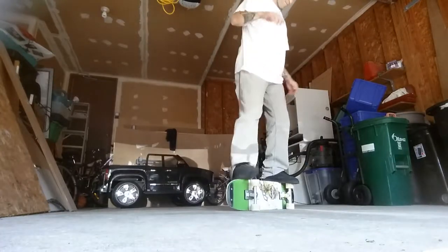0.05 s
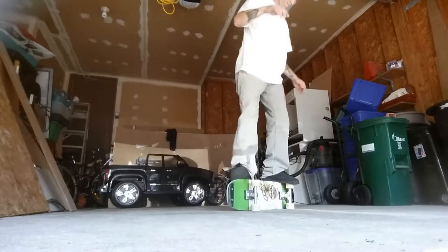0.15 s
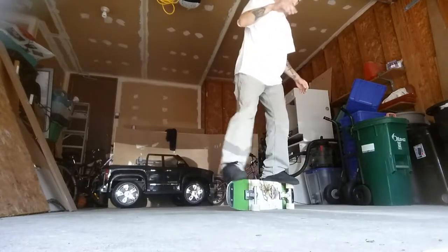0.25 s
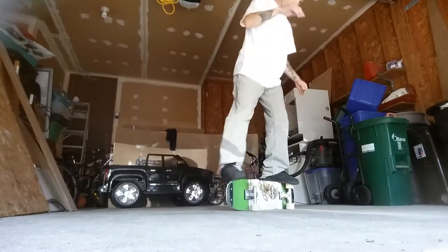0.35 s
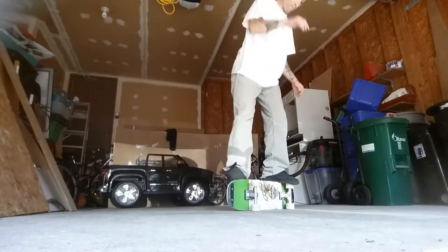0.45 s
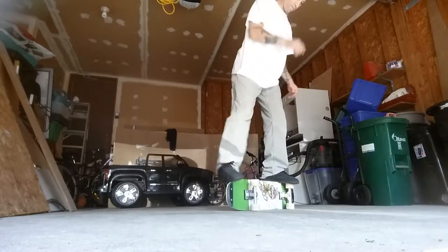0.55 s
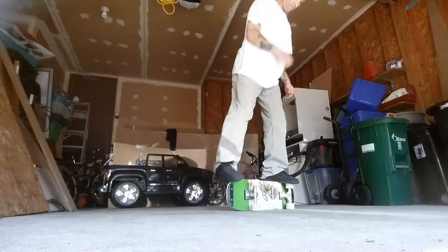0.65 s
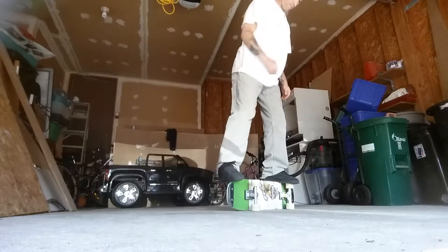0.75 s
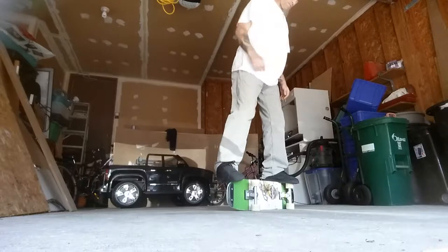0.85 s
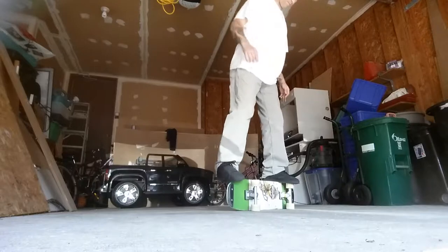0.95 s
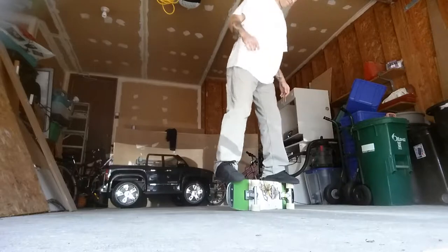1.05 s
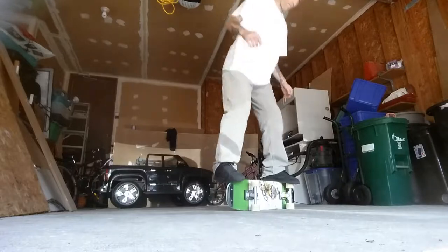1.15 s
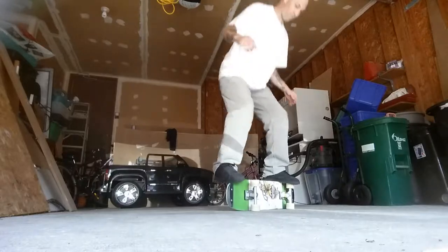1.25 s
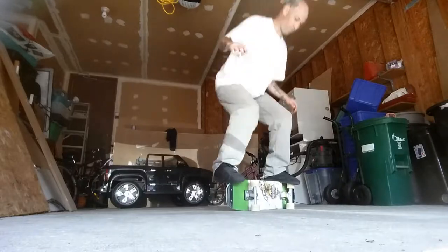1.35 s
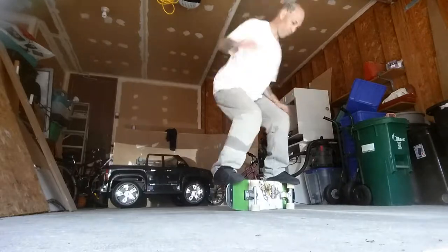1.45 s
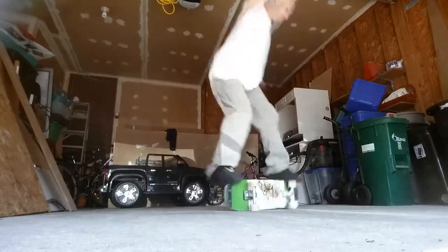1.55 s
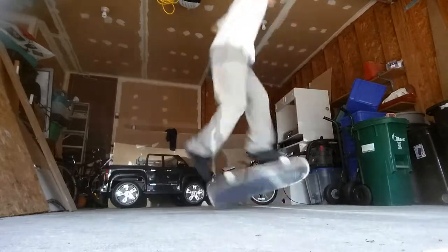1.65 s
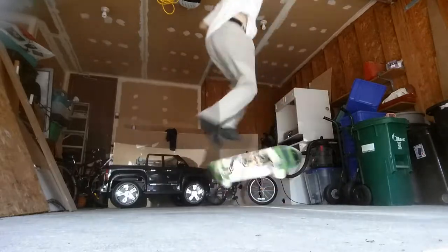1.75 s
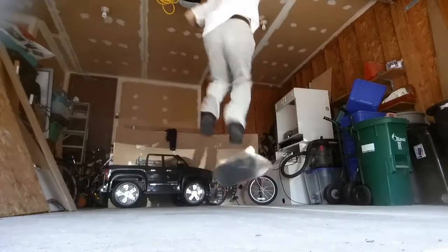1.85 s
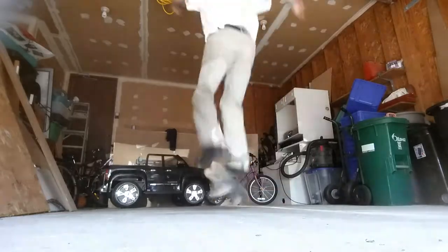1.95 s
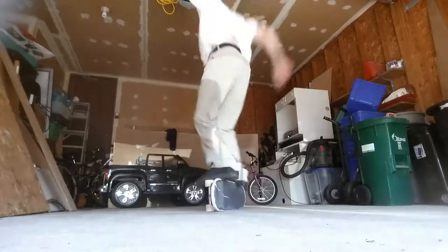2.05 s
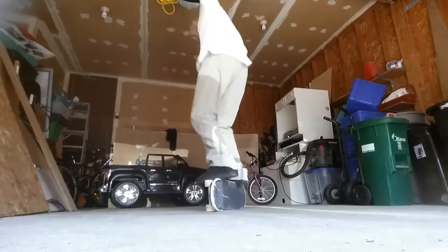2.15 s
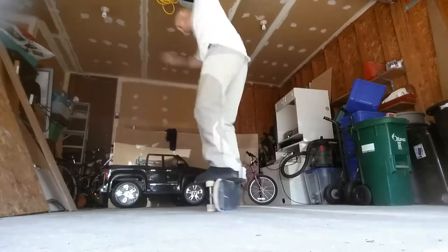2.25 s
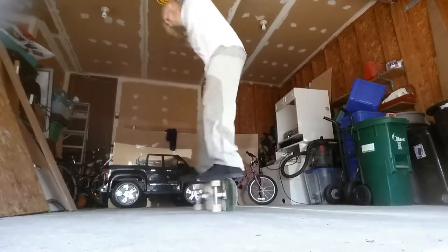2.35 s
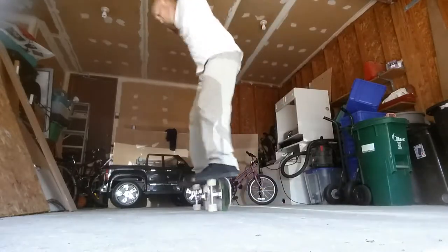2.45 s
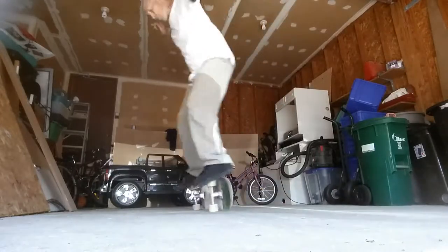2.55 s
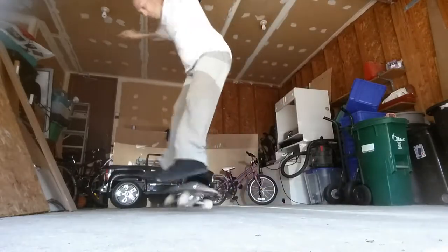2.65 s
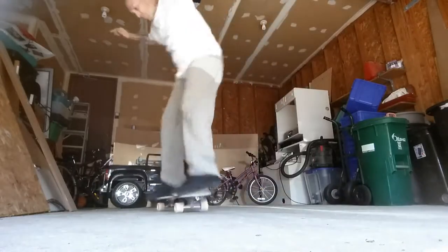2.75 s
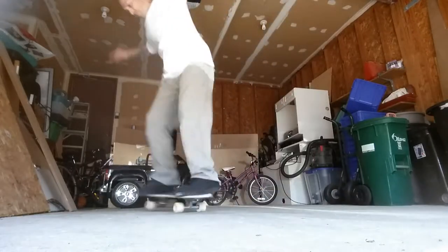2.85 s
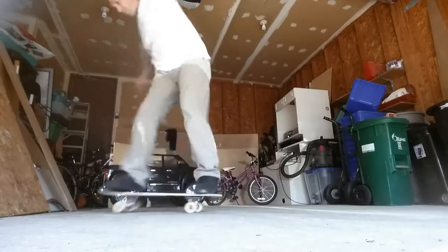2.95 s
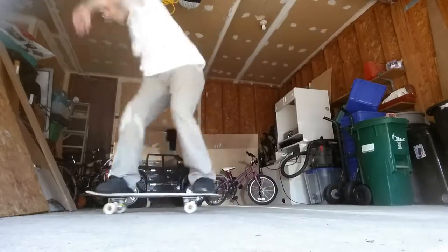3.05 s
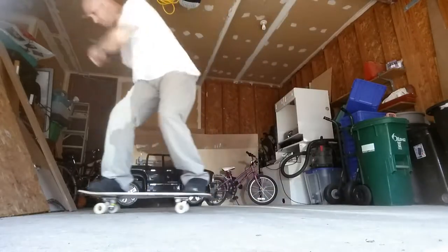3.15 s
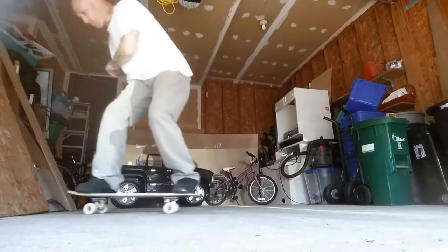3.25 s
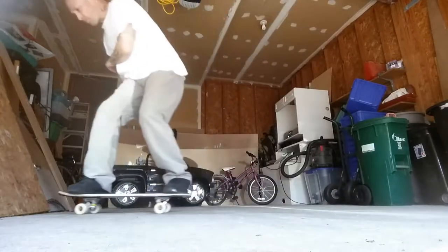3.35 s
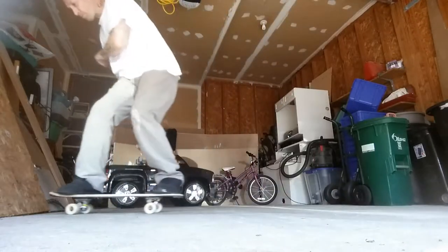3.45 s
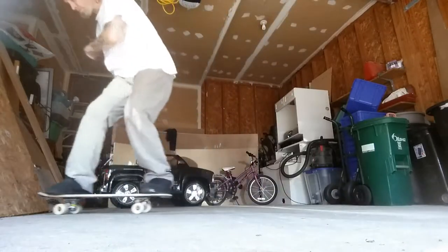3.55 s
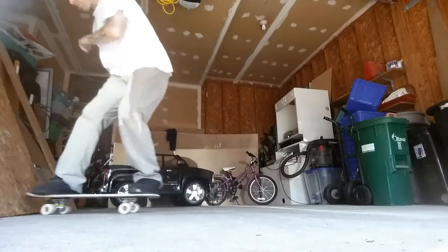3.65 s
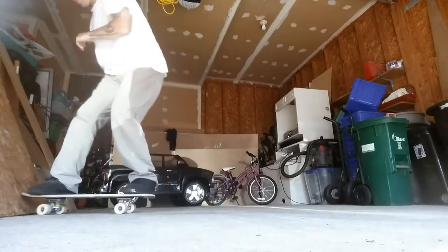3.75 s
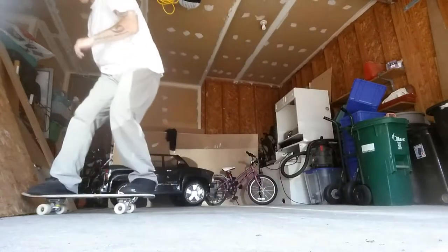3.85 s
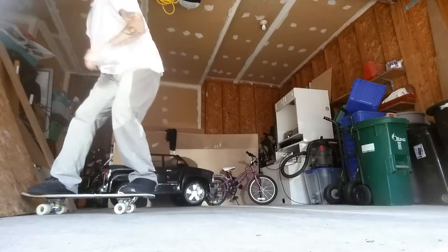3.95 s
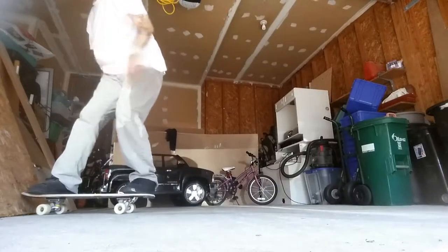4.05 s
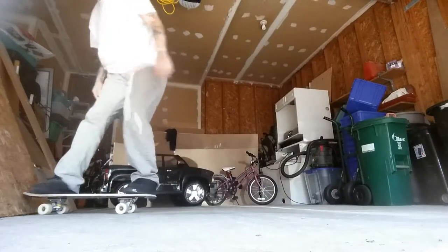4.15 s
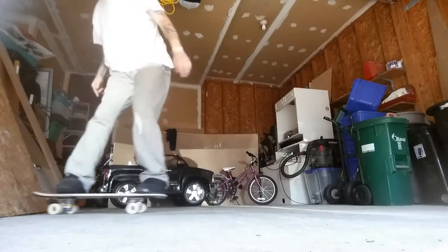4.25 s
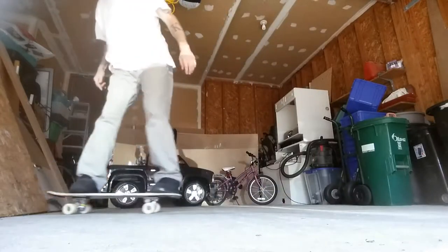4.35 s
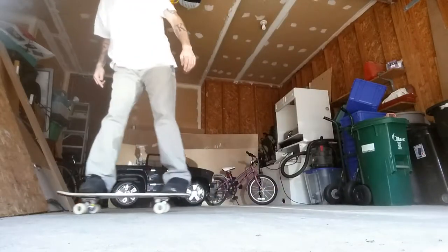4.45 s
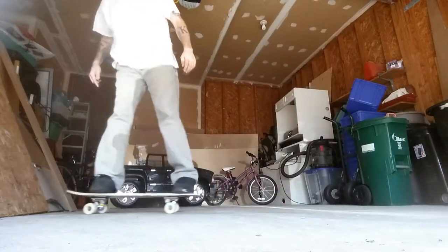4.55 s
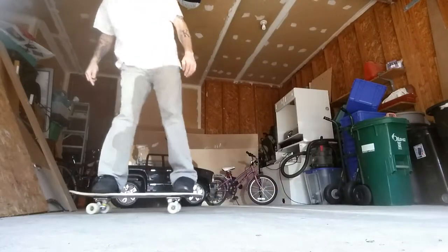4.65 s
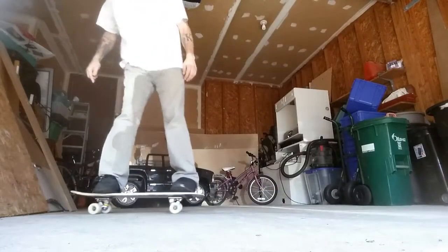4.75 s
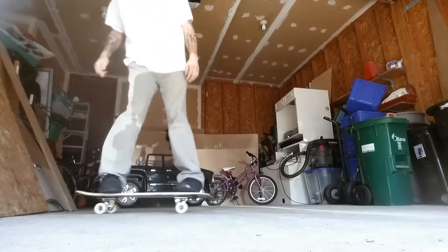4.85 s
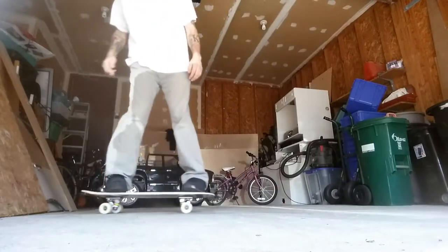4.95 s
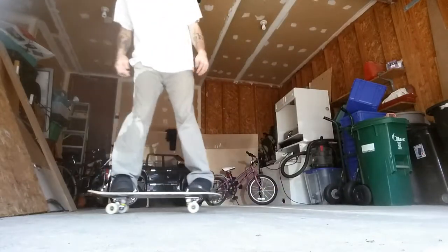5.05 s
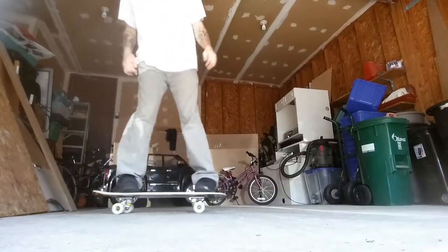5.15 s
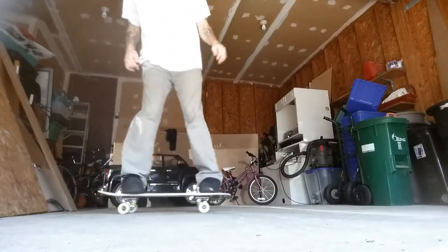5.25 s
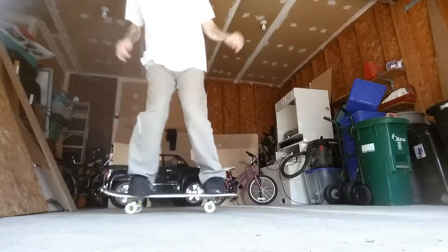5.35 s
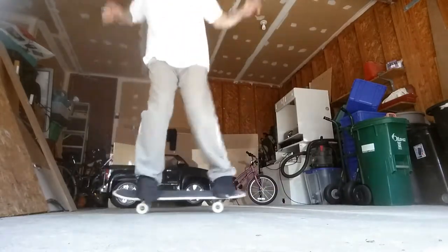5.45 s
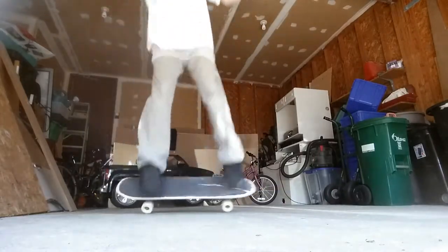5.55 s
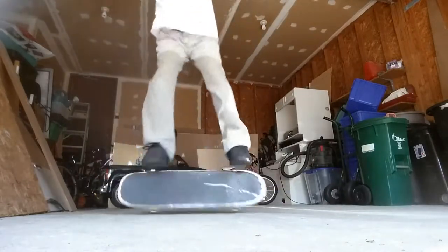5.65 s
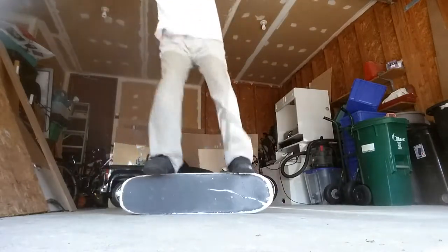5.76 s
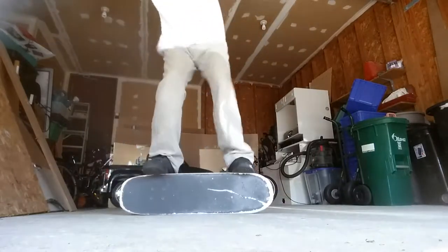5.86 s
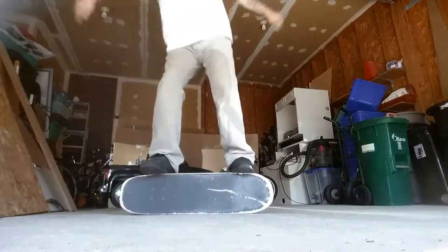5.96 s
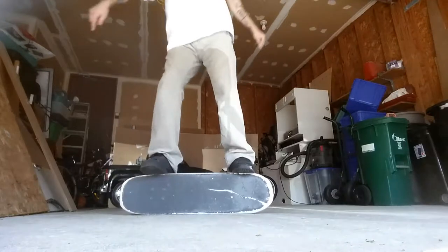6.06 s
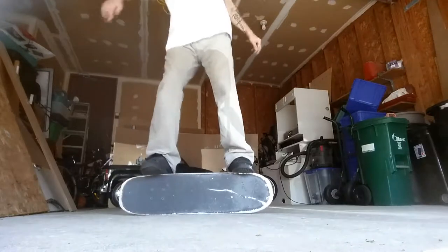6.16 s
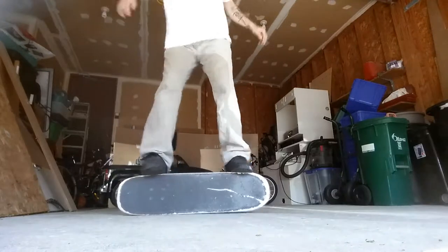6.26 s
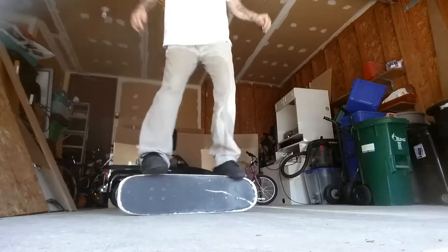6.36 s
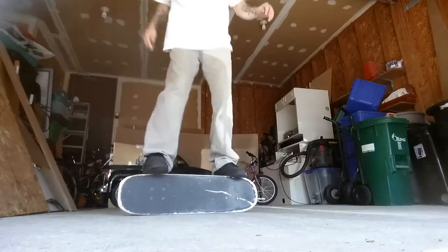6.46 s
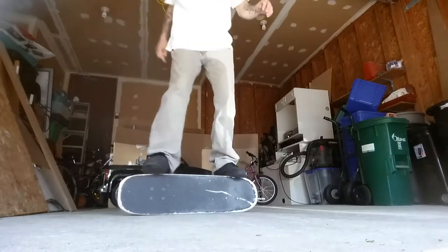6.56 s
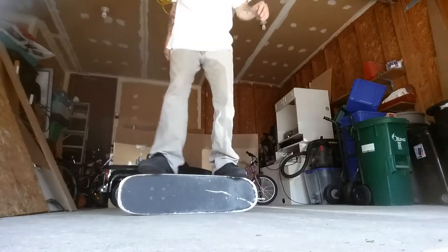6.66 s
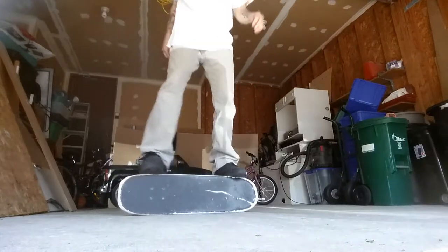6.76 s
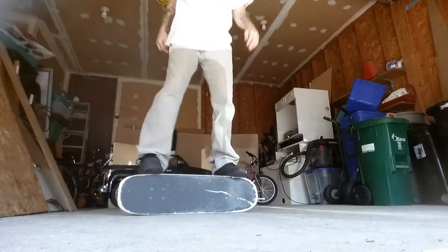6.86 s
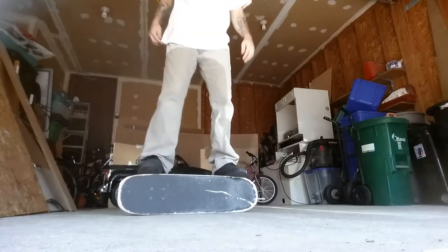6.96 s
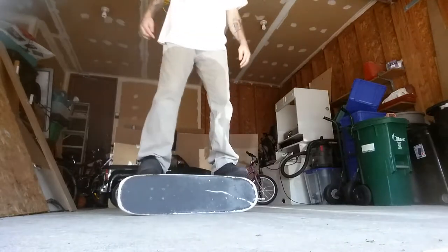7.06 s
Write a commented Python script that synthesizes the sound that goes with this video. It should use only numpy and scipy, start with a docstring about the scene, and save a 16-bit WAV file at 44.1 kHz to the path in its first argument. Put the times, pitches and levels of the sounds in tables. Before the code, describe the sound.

In a small hard garage, a skateboard on its edge knocks on concrete amid gritty scuffs, then flips and lands in a loud wooden clatter. A second heavy slam follows, then lighter knocks and wheel slaps, a heavy deck knock, near quiet, and a final sharp slam onto the edge. Small creaks and one more knock trail off. Faint low motor hum; close low stereo microphones with short dense echo.

```python
"""Wooden knocks, clattering landings, scuffs and rolling wheels ring out in a small hard garage over a low hum.
A skater flips his board off its edge, lands, pivots, rolls and kicks it back onto its edge.
Each blow is a filtered burst with deck tones, heard directly and by echo; low booms and truck rings join it.
Scuffs and rolling are grains of noise, creaks are short runs of slips, and the hum is motor tones with faint air.
Two microphones of unlike colour pick it all up."""
import sys
import numpy as np
from scipy import signal
from scipy.fft import rfft, irfft
from scipy.io import wavfile
from scipy.ndimage import uniform_filter1d

SR = 44100
rng = np.random.default_rng(int(sys.argv[2]) if len(sys.argv) > 2 else 0)


def store_wav(level_fs):
    """Save 16-bit WAV to argv[1]."""
    pcm = np.round(np.clip(np.atleast_2d(level_fs), -1, 1) * 32767)
    wavfile.write(sys.argv[1], SR, pcm.T.astype(np.int16))


N = 313992  # samples in the whole scene
SIZE = 24576  # samples in one blow, boom, creak, ring or echo

# frequency ranges of thud, knock, clack and rattle: from f/Hz, to f/Hz
BLOW_BANDS = [(100, 450), (450, 1500), (1500, 3200), (4500, 12000)]
# broad colour of a blow on the board: f/Hz, level per Hz/dB
BLOW_COLOUR = [(25, -52), (65, -8.5), (150, -4), (350, -1), (700, 0), (1300, -1), (2100, -5.5), (2800, -13),
               (3700, -25), (5200, -27), (6900, -23), (9000, -41), (14000, -53)]
# the deck knocks on the concrete, booming low under the rider's weight and higher on its edge:
# t/s, force/dB, hardness/dB, room/dB, favoured f/Hz, middle of the boom f/Hz
DECK_KNOCKS = [(.05, -17.5, 0, -5.5, 1120, 1102), (0.2973, -18.5, 7.5, 2.5, 1730, 417),
               (.578, -21, -0.5, 2.5, 655, 645), (1.669, -24, 12, 0.5, 736, 504),
               (1.692, -23, -1, 5, 710, 81), (1.785, -25, -4, 6, 496, 71.5),
               (2.142, -19.5, -6, 2.5, 840, 180), (2.486, -17.5, 5.5, 2, 1480, 370.3),
               (2.535, -26.5, -12, 3.5, 583, 309), (2.63, -25.5, -18, 6, 594, 433.3),
               (2.891, -19, 2.5, 4, 254, 165.7), (3.838, -9.5, -10, -0.5, 1440, 189.9),
               (3.853, -14, -14, -0.5, 629, 213.6), (3.932, -27.5, -4.5, 4, 316, 288.4),
               (5.712, -14.5, 16, -1.5, 1505, 135.5), (6.474, -14, -1.5, -1.5, 952, 153)]
# wheels slap down and shake the trucks: t/s, force/dB, hardness/dB, room/dB
WHEEL_SLAPS = [(1.725, -33.5, 16, -22), (2.598, -29.5, -3, 4.5), (2.816, -21.5, 0.5, 12),
               (2.855, -25, -1.5, 14.5), (2.876, -33.5, -3, 23.5), (3.105, -16.5, 3, 8),
               (3.12, -25.5, -3.5, 20), (5.145, -30, 0.5, 0), (5.639, -27.5, 7, 4),
               (5.651, -21.5, -2.5, 10), (5.7023, -13, -12, 9)]
# strokes of soles and wheels over the floor: start t/s, length/s, grinding/dB, hiss/dB
FLOOR_STROKES = [(0, 0.026, -41, -56), (0.117, 0.18, -29.5, -40.5), (0.26, 0.63, -46.5, -56),
                 (0.454, 0.18, -39, -48), (1.3, 0.48, -50.5, -57), (1.638, 0.13, -25, -44),
                 (1.789, 0.25, -32.5, -41.5), (2.364, 0.19, -35, -50), (2.706, 0.11, -43.5, -55.5),
                 (3.515, 0.78, -52.5, -74.5), (4.226, 0.53, -53, -68), (4.378, 0.094, -38, -51),
                 (4.703, 0.29, -51, -58), (4.88, 0.31, -49, -54.5), (5.296, 0.36, -50, -42),
                 (5.515, 0.12, -35.5, -44.5), (6.31, 0.46, -48.5, -58), (6.794, 0.27, -51, -82)]


def amp(db):
    """Turns decibels into a gain."""
    return 10 ** (np.asarray(db) / 20)


def evened(x):
    """Scales to an rms (average strength) of one."""
    return x / np.sqrt(np.mean(x ** 2) + 1e-20)


def unit(x):
    """Scales each channel to an energy of one."""
    return x / np.sqrt(np.sum(x ** 2, axis=-1, keepdims=True) + 1e-20)


def read(points, hz):
    """Reads a curve between its points on a log-frequency axis."""
    f, value = np.transpose(points)
    return np.interp(np.log(hz + 1), np.log(f + 1), value)


def add(mix, s, sound):
    """Mixes a sound in at time s, cut off at the end of the scene."""
    part = mix[:, max(round(s * SR), 0):][:, :sound.shape[1]]
    part += sound[:, :part.shape[1]]


def tinted(x, points):
    """Filters x by a spectrum and scales it to an rms of one."""
    gain = amp(read(points, np.fft.rfftfreq(N, 1 / SR)))
    return evened(irfft(rfft(x) * gain, N))


def causal(db):
    """Minimum-phase filter with the given gain: nothing sounds before the contact."""
    log_gain = np.log(amp(np.r_[db, db[-2:0:-1]]))
    return np.exp(np.conj(signal.hilbert(log_gain)))[:len(db)]


def resonance(hz, centre, q):
    """Power gain of one resonance, about 1 at its centre; a higher q is narrower."""
    ratio = (hz + 1) / centre
    return 1 / (1 + (q * (ratio - 1 / ratio)) ** 2)


def diffuse(pair):
    """Two unrelated signals as sound from all around: alike in the bass, unlike in the treble."""
    # left-right likeness of the room sound: f/Hz, likeness (1 = the same)
    likeness = [(60, 1), (130, 0.87), (260, 0.9), (500, 0.66), (1000, 0.063), (3000, 0), (8000, 0)]
    a, b = rfft(pair)
    same = np.clip(read(likeness, np.fft.rfftfreq(pair.shape[1], 1 / SR)), -1, 1)
    mid, side = a * np.sqrt((1 + same) / 2), b * np.sqrt((1 - same) / 2)
    return irfft([mid + side, mid - side], pair.shape[1])


def garage(gap=0.00089, build=0.0039, single_db=-4, thin=0.014):
    """Echo from one spot: a few wall reflections in a dense tail, each band dying at its own speed."""
    # gap: silence first (s); build: time to full strength (s); thin: how fast single reflections fade (s)
    # echo decay: f/Hz, time to die by 60 dB/s
    decay = [(100, 0.27), (300, 0.39), (800, 0.38), (2000, 0.44), (6000, 0.41), (14000, 0.27)]
    t = np.arange(SIZE) / SR
    # about 400 single reflections a second
    walls = rng.standard_normal((2, SIZE)) * (rng.random(SIZE) < 400 / SR) * np.exp(-t / thin)
    taps = diffuse(rng.standard_normal((2, SIZE)) + 10 * amp(single_db) * walls)
    hz, age, z = signal.stft(taps, SR, nperseg=256)
    fade = np.exp(-np.log(1000) * age / read(decay, hz)[:, None])
    tail = signal.istft(z * fade, SR)[1][:, :SIZE]
    return unit(tail * np.clip((t - gap) / build, 0, 1))


def hum(motor_db=0, air_db=-2.5, waver=0.005):
    """A small motor's overtones beat into a low throb with faint air, rising and sinking on a set curve."""
    motor_hz = 21.9  # average turns per second of a small motor somewhere in the garage
    # motor overtones: multiple of the turning speed, relative level/dB
    overtones = [(4, 0.5), (5, 3), (6, 1.5), (8, -5.5), (11, -5.5), (12, -13.5)]
    # colour of the air: f/Hz, level per Hz/dB
    air_colour = [(25, -23.5), (45, -8), (120, 1), (170, -5.5), (250, -6.5), (500, -12.5), (1000, -20),
                  (2000, -26.5), (3700, -38), (6800, -34), (10000, -59)]
    # loudness of motor and air together: t/s, level/dB
    hum_level = [(0.0, -42), (1.09, -50.5), (1.35, -46), (2.0, -49.5), (2.202, -59), (3.7, -54.5),
                 (3.959, -48.5), (4.69, -55), (5.13, -46), (5.74, -47), (6.1, -60.5), (7.11, -53)]
    drift = evened(uniform_filter1d(rng.standard_normal(N), SR // 4))
    turns = np.cumsum(motor_hz * (1 + waver * drift)) / SR
    tones = [amp(db) * np.sin(2 * np.pi * (round(k) * turns + rng.random())) for k, db in overtones]
    motor = evened(sum(tones))
    air = tinted(diffuse(rng.standard_normal((2, N))), air_colour)
    loudness = amp(np.interp(np.arange(N) / SR, *np.transpose(hum_level)))
    return (amp(motor_db) * motor + amp(air_db) * air) * loudness


def arches(levels_db):
    """Each stroke is one arch of pressure at the given height; overlapping strokes add their power."""
    skew, point = 0.8, 1.41  # the top lies a little before the middle; a higher point is a sharper arch
    power = np.zeros((1, N))
    for (s, length, *_), db in zip(FLOOR_STROKES, levels_db):
        u = np.linspace(0, 1, int(length * SR))
        arch = amp(db) * abs(np.sin(np.pi * u ** skew)) ** point
        add(power, s, arch[None] ** 2)
    return np.sqrt(power[0])


def grit(per_s, spread_db):
    """Grains of concrete and grip tape catch and let go: many small, a few large."""
    size = amp(spread_db * np.minimum(rng.exponential(1, N), 4))
    return rng.standard_normal(N) * size * (rng.random(N) < per_s / SR)


def shifting(x, patchy_db=2.5):
    """A scrape's colour shifts from moment to moment as the contact moves over the grit."""
    z = signal.stft(x, nperseg=512)[2]
    patches = uniform_filter1d(rng.standard_normal(z.shape), size=5, axis=0)  # smooth over frequency
    patches = evened(uniform_filter1d(patches, size=8, axis=1))  # smooth over time
    return signal.istft(z * amp(patchy_db * np.tanh(patches)))[1][:N]


def rubbing(grind_db=-2.5, rasp_db=0, hiss_db=-1, direct_db=-4, uneven_db=3.0, slip=0.015):
    """Soles and wheels drag over grit in uneven slips (smoothed over slip seconds); the room smears them."""
    # the deck murmuring under the soles: f/Hz, level per Hz/dB
    grind_colour = [(120, -13), (300, -2.5), (500, 2), (1050, 0), (1600, -19), (3000, -41), (8000, -71.5)]
    # the rasp in between: f/Hz, level per Hz/dB
    rasp_colour = [(700, -7.5), (1500, -1), (2300, -7), (3300, -15), (5000, -46.5), (10000, -55.5)]
    # grit hissing under wheels and shoes: f/Hz, level per Hz/dB
    hiss_colour = [(500, -35), (1500, 2), (3500, -9.5), (5000, -6), (7000, -3), (9500, -24.5),
                   (14000, -38.5)]
    _, _, grind, hiss = np.transpose(FLOOR_STROKES)
    slips = uniform_filter1d(rng.standard_normal(N), max(int(slip * SR), 1))
    pressure = amp(uneven_db * evened(slips))
    rasp = (grind + hiss) / 2  # a rasp needs both weight and sliding
    layers = [(tinted(grit(370, 2.4), grind_colour), grind + grind_db),
              (shifting(tinted(grit(570, 2.7), rasp_colour)), rasp + rasp_db),
              (shifting(tinted(grit(3700, 2.0), hiss_colour)), hiss + hiss_db)]
    out = np.zeros((2, N))
    for grains, level in layers:
        dragged = evened(grains * pressure) * arches(level)
        echo = signal.oaconvolve(dragged[None], garage(), axes=1)[:, :N]
        out += amp(direct_db) * dragged + echo
    return out


def contacts():
    """Lists every contact by force, deep bass, mix and room; harder ones have more clack and rattle."""
    # the whole board comes down and clatters, corner after corner:
    # t/s, force/dB, low thud/dB, wooden clack/dB, room/dB, favoured f/Hz
    landings = [(1.7545, -5.5, -17.5, -7.5, 5.5, 2700), (1.765, -10, -25, -12.5, 9.5, 720),
                (1.781, -7, -19.5, -13.5, 1.5, 760), (1.81, -10, -22, -10.5, 8, 802),
                (2.095, -15.5, -5, -11, 3, 909), (2.101, -2.5, -10, -4.5, -0.5, 988),
                (2.111, -8.5, -14.5, -10.5, 3.5, 1070), (2.121, -5, -13, -1, -1.5, 2200),
                (2.147, -14, -10.5, -8, 15, 2905), (5.8177, -28, -18, -14, 14, 1373),
                (5.8254, -2, -4, -12, -2, 560), (5.844, -2.5, -6.5, -9, 3.5, 598)]
    # shared by all slaps: deep bass/dB, thud/dB, clack/dB, rattle/dB, favoured f/Hz
    slap_colour = (-8, -10.5, -3.5, -9, 337)
    # trucks and grit tick as the weight shifts, and the board touches down lightly just before the landing at
    # 2.1 s: t/s, force/dB
    ticks = [(0.1295, -31), (2.089, -26), (2.721, -48), (3.78, -47), (4.6286, -43), (4.757, -40),
             (5.1554, -34), (5.2255, -34.5)]
    # shared by all ticks: thud/dB, clack/dB, rattle/dB, room/dB, favoured f/Hz
    tick_colour = (-20, -6.5, -16, 6, 1700)
    landing_rattle_db = -17
    knock_thud_db, knock_clack_db, knock_rattle_db = 2, -8.5, -17.5  # before weight and hardness
    light_hz = 416.7  # a knock that booms above this has little weight behind it, and loses its thud
    for s, force, thud, clack, wet, bite in landings:
        yield s, force, 0, thud, clack, landing_rattle_db, wet, bite
    for s, force, hard, wet, bite, hz in DECK_KNOCKS:
        thud = knock_thud_db - 10 * np.log10(1 + (hz / light_hz) ** 5)
        yield s, force, 0, thud, knock_clack_db + hard, knock_rattle_db + hard, wet, bite
    for s, force, hard, wet in WHEEL_SLAPS:
        bass, thud, clack, rattle, bite = slap_colour
        yield s, force, bass, thud, clack + hard / 2, rattle + hard, wet, bite
    for s, force in ticks:
        yield s, force, 0, *tick_colour


def contact(chatter_db=-3, soft=0.0001):
    """Spectrum of the direct sound: a quickly damped woody clack and a rough edge chattering on concrete."""
    # first answer of the plank, before a random detune: f/Hz, level/dB, time to die by 60 dB/s
    plank = [(664, -5.5, 0.036), (1238, -0.5, 0.0039), (1590, 4, 0.0051), (2129, 3, 0.019)]
    chatter_s = 0.0019  # the chatter is strongest this long after the contact
    t = np.arange(SIZE) / SR
    hz, db, t60 = np.transpose(plank)[:, :, None]
    spot = rng.uniform(.92, 1.08, hz.shape)
    tones = np.sin(2 * np.pi * hz * spot * t) * np.exp(-np.log(1000) * t / t60)
    clack = (amp(db) * unit(tones)).sum(0)
    clack = rfft(clack * (1 - np.exp(-t / soft)))  # softened start, in s
    middle = np.fft.rfftfreq(SIZE, 1 / SR) < BLOW_BANDS[2][1]
    rough = unit(rng.standard_normal(SIZE) * t * np.exp(-t / chatter_s))
    return clack / np.sqrt(np.mean(abs(clack[middle]) ** 2)) + amp(chatter_db) * rfft(rough)


def deck_modes(ring_db=-22):
    """The deck rings at set pitches that each die away; gives one spectrum for each."""
    # ringing of the deck: f/Hz, relative level/dB, time to die by 60 dB/s
    deck = [(205, -13, 0.32), (337.3, -0.5, 0.12), (395.3, 4, 0.13), (480, -4.5, 0.073), (620, -1, 0.038),
            (647, 2, 0.056), (1058, 3.5, 0.05), (1393, -2, 0.063), (1743, -13.5, 0.049), (2350, -7, 0.11),
            (3110, -3, 0.046)]
    t = np.arange(SIZE) / SR
    hz, db, t60 = np.transpose(deck)[:, :, None]
    tones = np.cos(2 * np.pi * hz * t) * np.exp(-np.log(1000) * t / t60)
    return rfft(amp(db + ring_db) * unit(tones))


def blows(level_db=18.5, direct_db=0, room_db=1.0, fizz=0.17):
    """Blows share their energy between thud, knock, clack and rattle, and arrive directly and by the walls."""
    # the board's place, as the lag of the left microphone (negative: the right one lags): t/s, lag/ms
    place = [(0, -0.065), (2.8, -0.032), (3.1, .27), (3.85, 0.44), (5.0, 0.18), (5.8, -0.1)]
    bite_db, bite_q = 2.5, 4.4  # the spot struck favours one broad resonance of the deck
    hz, out = np.fft.rfftfreq(SIZE, 1 / SR), np.zeros((2, N))
    colour = causal(read(BLOW_COLOUR, hz))
    centres = np.sqrt(np.prod(BLOW_BANDS, axis=1))
    top_octave = np.clip((hz - 7500) / 2000, 0, 1)  # only hard metal contacts reach up here
    deep = 1 / (1 + (hz / BLOW_BANDS[0][0]) ** 4)  # weight of the deep bass, below the thud
    modes = deck_modes()
    echoes = [rfft(garage()) for _ in range(11)]  # taken in turn
    for k, (s, force, bass, thud, clack, rattle, wet, bite) in enumerate(contacts()):
        spot = rng.uniform(-1.1, 1, (len(modes), 1))  # each spot struck wakes the modes differently
        favoured = 10 * np.log10(1 + amp(bite_db) ** 2 * resonance(hz, bite, bite_q))
        hit = (1 + (spot * modes).sum(0)) * colour * causal(favoured + bass * deep)
        # correct the energy held in each band to its wanted share
        energies = [2 * np.sum(abs(hit[(hz > lo) & (hz < hi)]) ** 2) / SIZE for lo, hi in BLOW_BANDS]
        shares = np.array([thud, 0, clack, rattle]) - 10 * np.log10(energies)
        hit = hit * causal(read(np.c_[centres, shares], hz) + fizz * (rattle + 12) * top_octave)
        lag = np.interp(s, *np.transpose(place)) / 1000  # ms to s
        direct = contact() * np.exp(-2j * np.pi * hz * np.maximum([[lag], [-lag]], 0))
        paths = amp(direct_db) * direct + amp(room_db + wet) * echoes[k % len(echoes)]
        add(out, s, amp(level_db + force) * irfft(hit * paths))
    return out


def thumps(rise=0.0075, t60=0.27, spread=.13, damped_hz=900):
    """After a knock a cluster of close deck and room tones swells and dies, the sooner the higher it lies."""
    # rise in s; t60: time in s for the lowest tones to die by 60 dB; spread: share of the pitch
    boom_db = -8.5
    t, out = np.arange(SIZE) / SR, np.zeros((2, N))
    for s, force, _, wet, _, hz in DECK_KNOCKS:
        tones = hz * np.exp(spread * rng.standard_normal((20, 1)))
        damping = np.hypot(1, hz / damped_hz)
        swell = (1 - np.exp(-t / rise)) * np.exp(-np.log(1000) * t / t60 * damping)
        boom = unit(swell * np.sin(2 * np.pi * (tones * t + rng.random(tones.shape))).sum(0))
        add(out, s, amp(force + wet + boom_db) * np.linalg.norm(swell) * boom[None])
    return out


def creaks(slips_per_s=330, first=2, q=3, direct_db=-3, room_db=-1):
    """A first catch and a short run of uneven slips, heard through one resonance of the deck."""
    # soles catch and slip on grip tape and floor, and the deck creaks under them:
    # t/s, length/s, level/dB, pitch f/Hz
    creak_list = [(0.502, 0.058, -40.5, 1370), (1.006, 0.021, -44.5, 580), (4.423, 0.055, -46, 1310),
                  (5.1, 0.007, -63, 2590), (5.46, 0.052, -44.5, 2050), (5.548, 0.017, -42, 2750),
                  (6.259, 0.024, -52.5, 470), (6.342, .06, -49, 900), (6.431, 0.016, -33.5, 790),
                  (6.785, 0.0064, -48, 988), (6.877, 0.066, -55, 845), (6.96, 0.033, -49, 473),
                  (7.017, 0.0036, -39, 1030)]
    t, hz, out = np.arange(SIZE) / SR, np.fft.rfftfreq(SIZE, 1 / SR), np.zeros((1, N))
    for s, length, db, pitch in creak_list:
        slips = rng.standard_normal(SIZE) * (rng.random(SIZE) < slips_per_s / SR)
        slips = slips + first * (t == 0)
        colour = causal(read(BLOW_COLOUR, hz) + 10 * np.log10(resonance(hz, pitch, q)))
        creak = unit(irfft(rfft(slips * np.exp(-(t / length) ** 2)) * colour))
        add(out, s, amp(db) * np.sqrt(length * SR) * creak[None])
    echo = signal.oaconvolve(out, garage(), axes=1)[:, :N]
    return amp(direct_db) * out + amp(room_db) * echo


def trucks(ring_db=-17, room_db=0):
    """Each slap of the wheels rings the trucks, the more the harder it is; bushings soon clamp the metal."""
    # metal of the trucks, before a random detune: f/Hz, relative level/dB, time to die by 60 dB/s
    truck_tones = [(5250, 5, .012), (5760, 6, .014), (6350, 5, .012), (7000, 2, .01)]
    t, out = np.arange(SIZE) / SR, np.zeros((2, N))
    hz, db, t60 = np.transpose(truck_tones)[:, :, None]
    for s, force, hard, _ in WHEEL_SLAPS:
        spot = rng.uniform(.94, 1.06, hz.shape)
        tones = np.sin(2 * np.pi * hz * spot * t) * np.exp(-np.log(1000) * t / t60)
        ring = (amp(db) * tones).sum(0)
        add(out, s, amp(ring_db + force + hard) * ring[None])
    return out + amp(room_db) * signal.oaconvolve(out, garage(), axes=1)[:, :N]


def scene():
    """Blows, booms, ringing trucks, creaks and rubbing, over a hum that rises and sinks."""
    board = blows() + thumps() + trucks() + creaks() + rubbing()
    return board + hum()


def record(dry, ceiling=0.89):
    """Two microphone ports of unlike colour, soft overload at the ceiling, then a cut of the highest treble."""
    # unlike colour of the two ports: f/Hz, left minus right/dB
    ports = [(150, -1.5), (400, -2), (1200, -2), (2700, -2.5), (4200, -8.5), (6400, -11.5), (9800, 10.5),
             (14000, 21.5)]
    lean = read(ports, np.fft.rfftfreq(N, 1 / SR)) / 2
    heard = irfft(rfft(dry) * amp([lean, -lean]), N)
    squeezed = ceiling * np.tanh(heard / ceiling)
    low_pass = signal.firwin(255, 15000, window=("kaiser", 9), fs=SR)  # cut above 15000 Hz
    return signal.oaconvolve(squeezed, low_pass[None], "same")


dry = scene()
out = record(dry)
store_wav(out)
```